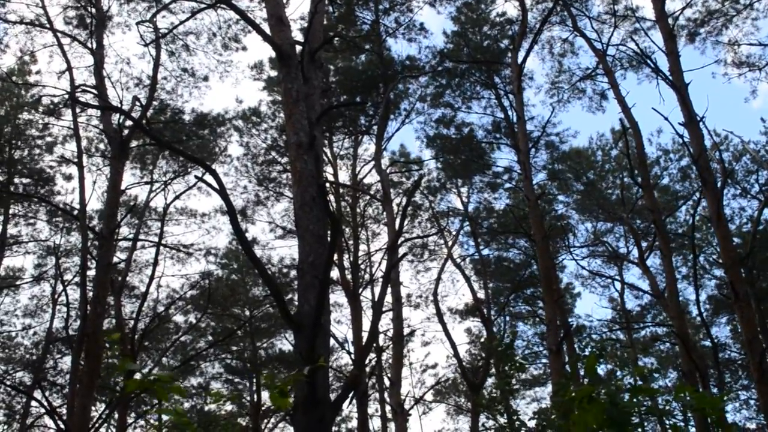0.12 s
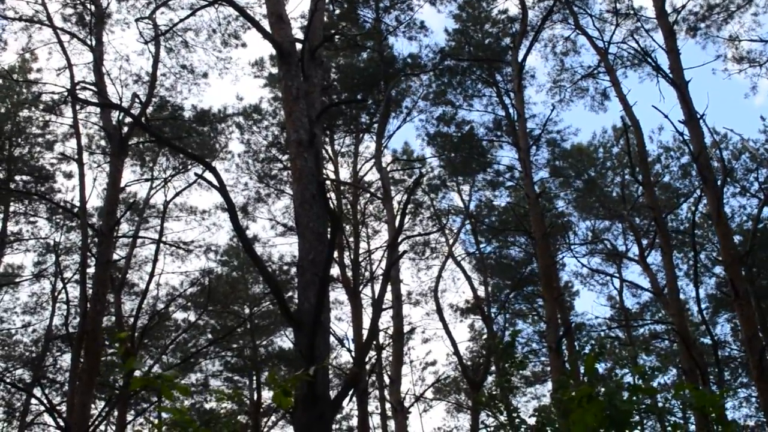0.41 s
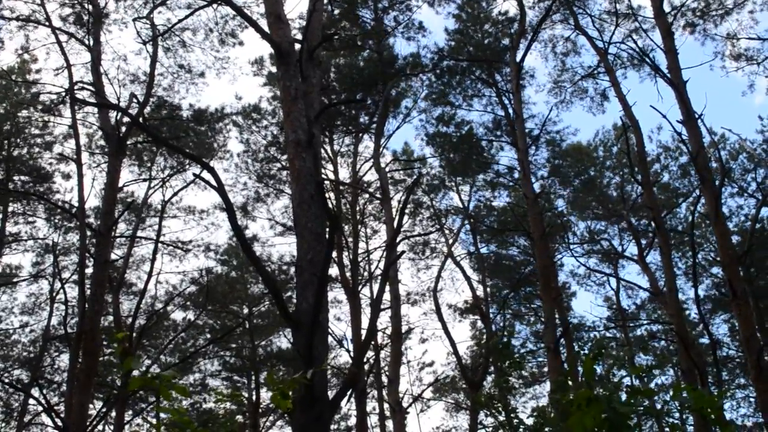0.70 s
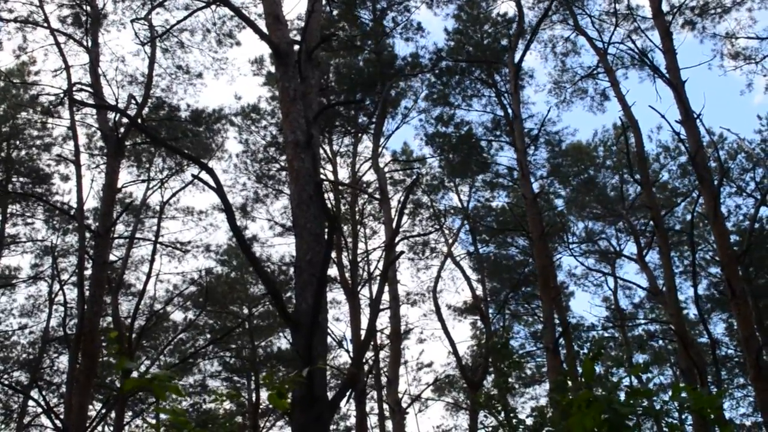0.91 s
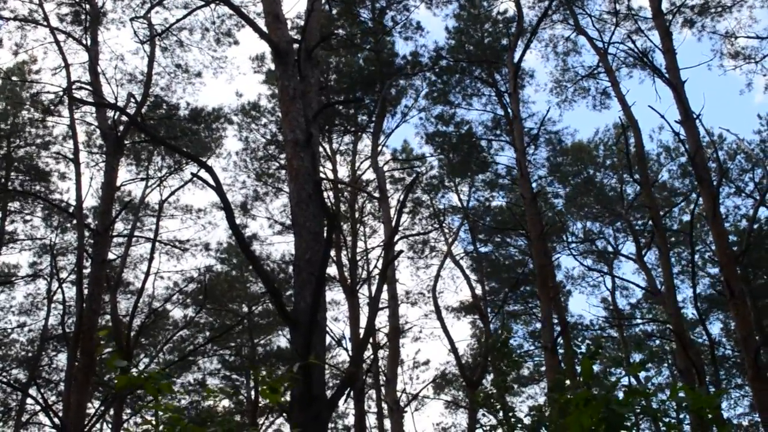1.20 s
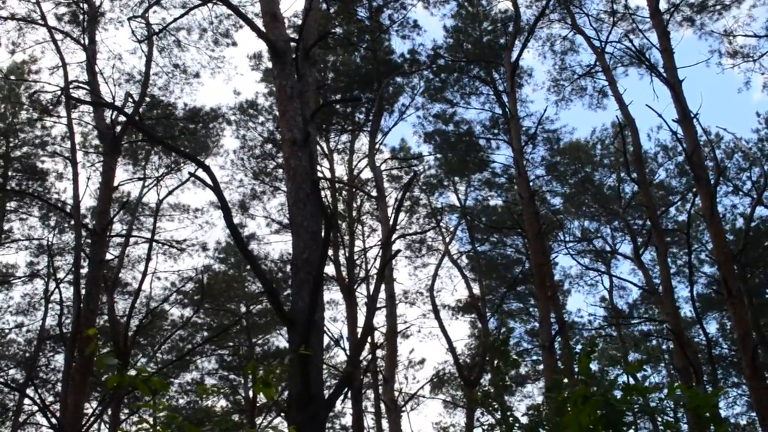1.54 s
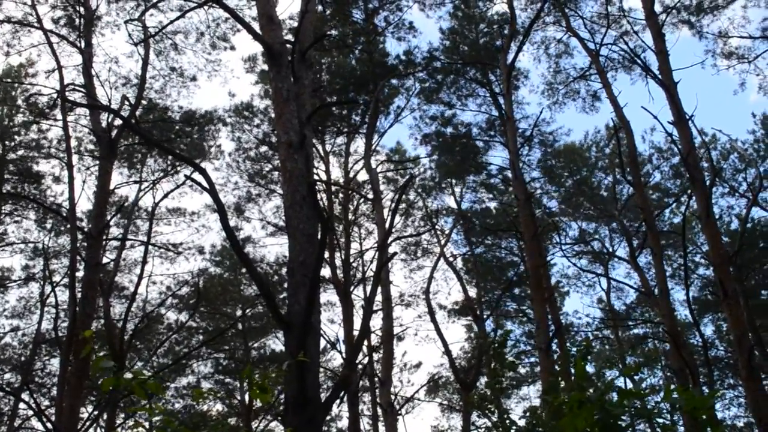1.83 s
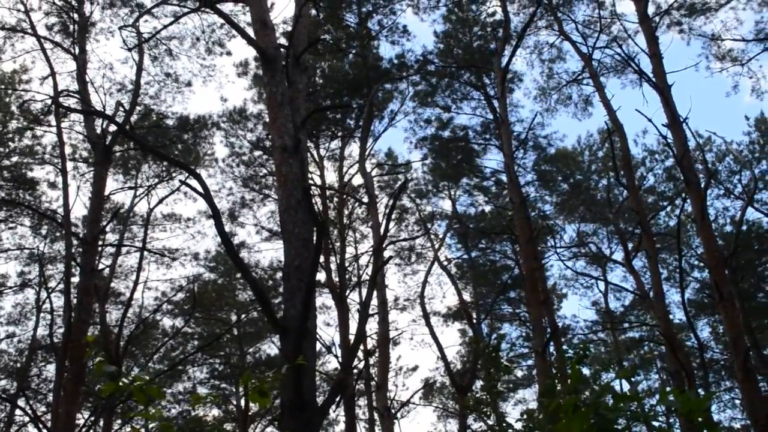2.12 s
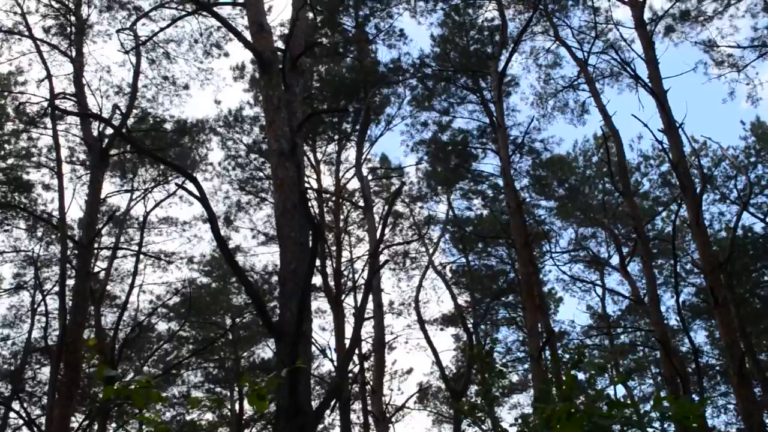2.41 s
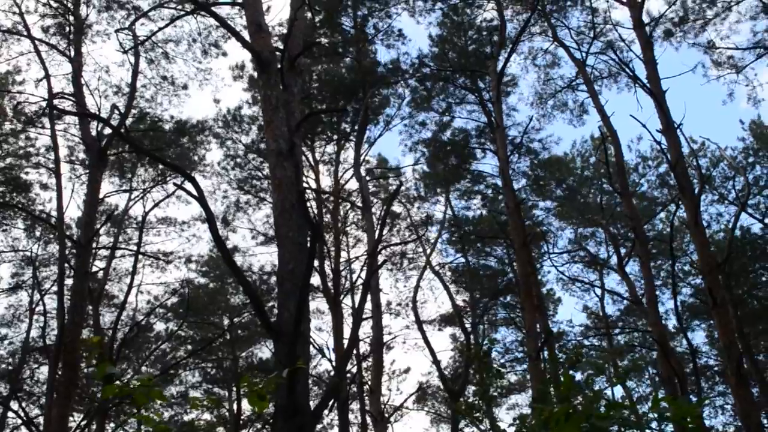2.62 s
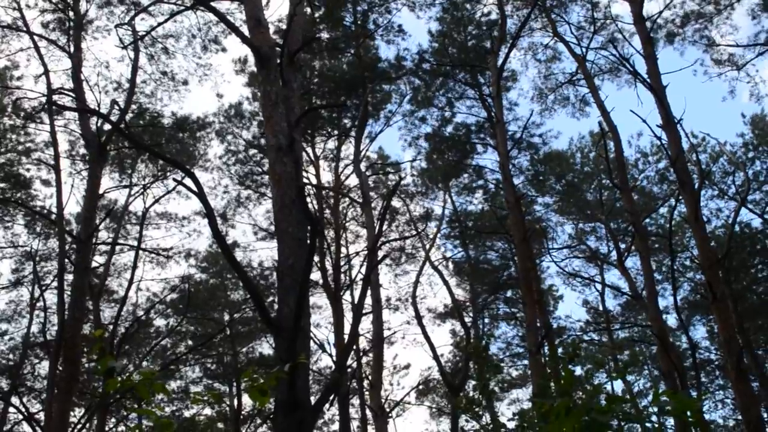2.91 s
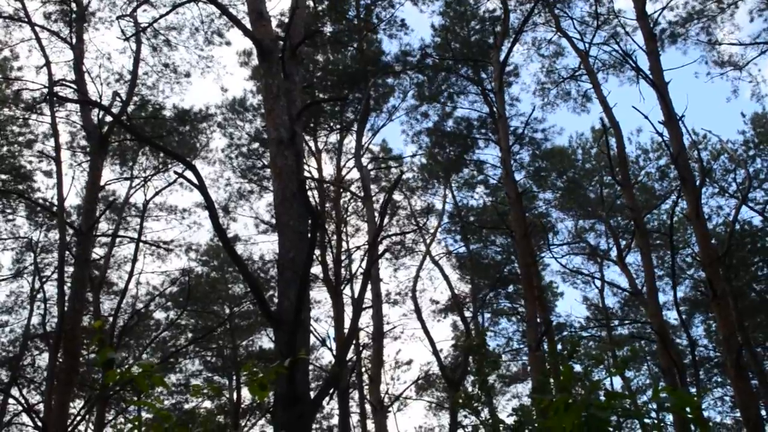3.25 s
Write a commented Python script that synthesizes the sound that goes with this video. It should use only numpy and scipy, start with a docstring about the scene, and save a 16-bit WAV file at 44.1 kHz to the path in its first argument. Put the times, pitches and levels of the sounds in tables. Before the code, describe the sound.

A songbird's high, sweeping chirps speed into a shivering trill, with faint birds farther off.

```python
"""A small songbird sings thin, upward-sweeping notes that speed up into a shivering trill.
Each note starts low and rich in overtones, then rises as an almost pure tone. The trunks of a quiet
pine forest scatter it into a short tail of echoes. Farther off, another bird whistles a low phrase
and faint calls waver. A twig ticks once, and air moves softly in the treetops."""
import sys
import numpy as np
from scipy import signal
from scipy.fft import rfft, irfft
from scipy.io import wavfile
from scipy.ndimage import uniform_filter1d

SR = 44100
rng = np.random.default_rng(int(sys.argv[2]) if len(sys.argv) > 2 else 0)


def file_out(sig):
    """Save sig as 16-bit WAV at sys.argv[1]."""
    # one column per channel
    cols = np.atleast_2d(sig).T
    # limit, then scale
    lim = np.clip(cols, -1, 1)
    pcm = np.round(lim * 32767).astype(np.int16)
    wavfile.write(sys.argv[1], SR, pcm)


N = 149940

# the colour of the moving air: (frequency [Hz], relative level [dB])
AIR_COLOUR = [(25, -18), (50, -17.5), (78, -10.5), (110, -13.5), (200, -9), (330, -2.5), (545, 1.5),
              (900, 0.5), (1300, -3), (1700, -7.5), (2450, -12), (3300, -13.5), (4500, -15.5), (6000, -25),
              (8000, -30.5), (10000, -27.5), (11000, -48.5)]
# the tones a twig rings with: (pitch [Hz], relative level [dB], time to fade by 60 dB [s])
TWIG_TONES = [(1404, 0, 0.027), (1950, -7, .025), (2530, -4.5, 0.014), (3190, 0.5, 0.013)]
# very distant calls: (start [s], length [s], first pitch [Hz], last pitch [Hz], level [dB])
DISTANT_CALLS = [(0, 0.132, 4580, 4340, -73), (0.41, 0.08, 2120, 2060, -65), (0.5, 0.28, 2310, 2260, -65),
                 (0.83, 0.055, 1806, 1815, -56.5), (0.88, 0.25, 2100, 2020, -65),
                 (1.275, 0.045, 2410, 2490, -60), (1.32, .11, 2510, 2490, -60),
                 (1.41, .11, 2420, 2130, -62)]
# the farther bird's whistles, one curve each: (time [s], pitch [Hz], level [dB])
WHISTLE_CURVES = [
    [(2.44, 1614, -75), (2.465, 1867, -55), (2.485, 1982, -48.5), (2.51, 1986, -65)],
    [(2.518, 2460, -60), (2.535, 2650, -54), (2.562, 2490, -54), (2.575, 2450, -68)],
    [(2.785, 2430, -58), (2.797, 2275, -49.5), (2.815, 2040, -61)],
    [(2.825, 1574, -53.5), (2.85, 1830, -53.5), (2.89, 1885, -47.5), (2.92, 1940, -45), (2.962, 1945, -45),
     (2.98, 2067, -54)],
    [(3.158, 2660, -58), (3.19, 2485, -47.5), (3.24, 2443, -51.5), (3.28, 2325, -43), (3.32, 2284, -52.5),
     (3.355, 2332, -51)],
    [(3.365, 2760, -61), (3.385, 2190, -49), (3.4, 1885, -44.5)],
]
# its one buzzy note: (time [s], pitch [Hz], level [dB])
BUZZ_CURVE = [(2.558, 2090, -48), (2.575, 2060, -51.5), (2.65, 2090, -45.5), (2.685, 2050, -51.5)]

# the songbird's notes; the "knee" is the moment when a note's low lead-in turns into its rise:
# (knee [s], lead-in [s], rise [s], top pitch [Hz], level [dB], shape [0 opening note to 1 trill note])
SONG_NOTES = [(0.1842, 0.015, 0.029, 9120, -34.5, 0.16), (0.3744, 0.016, 0.028, 8560, -34.5, 0.16),
              (0.5366, 0.013, 0.029, 8400, -31.5, 0.063), (0.6898, 0.016, 0.025, 8000, -27, 0.053),
              (0.8386, 0.016, 0.03, 7890, -26, 0.062), (.9825, 0.016, 0.032, 7920, -27.5, 0.012),
              (1.1236, 0.016, 0.029, 7820, -27, 0.081), (1.2552, 0.017, 0.029, 7800, -27, 0.066),
              (1.3875, 0.015, 0.029, 7750, -23, 0.039), (1.5205, 0.015, .029, 7650, -22, 0.25),
              (1.6352, 0.013, 0.023, 7580, -23, 0.29), (1.7132, 0.01, .018, 7480, -23.5, 0.6),
              (1.7715, 0.007, 0.022, 7520, -23, 0.9), (1.8329, 0.0076, 0.022, 7510, -23, 0.87),
              (1.893, 0.007, 0.022, 7440, -22.5, 0.9), (1.9543, 0.0074, 0.022, 7360, -23, 1),
              (2.0153, 0.0074, .0235, 7410, -23, 0.95), (2.0772, 0.0082, 0.021, 7480, -22.5, 1),
              (2.1379, 0.009, 0.021, 7530, -22.5, 0.94), (2.2, 0.011, 0.021, 7460, -23.5, 1),
              (2.2621, 0.012, 0.021, 7340, -23.5, 0.92), (2.3222, 0.011, 0.022, 7250, -24, 0.93),
              (2.3838, .010, 0.023, 7230, -25, 0.97), (2.4458, 0.011, 0.024, 7330, -23.5, 1),
              (2.509, .011, 0.022, 7260, -23.5, 1), (2.5697, .010, .0235, 7340, -23.5, 1),
              (2.6340, 0.012, 0.02, 7340, -22.5, 1), (2.698, 0.012, 0.021, 7380, -22.5, 0.96),
              (2.7603, .013, 0.021, 7360, -22, 0.95), (2.8242, .012, 0.02, 7390, -21, 0.98),
              (2.8875, .012, 0.021, 7300, -23.5, 1), (2.9555, 0.014, .018, 7170, -23.5, 0.94),
              (3.0205, 0.014, 0.018, 7220, -24.5, 0.94), (3.0815, .012, 0.021, 7110, -24, 1)]
# the lead-ins of opening notes and of trill notes:
# (place [-1 start, 0 knee], pitch [Hz], level [dB], second harmonic [dB])
OPENING_LEAD_IN = [(-1.2, 1900, -74, -57), (-.9, 2150, -68, -53), (-.55, 2750, -51.5, -45),
                   (-0.26, 3600, -42.5, -47), (0, 4550, -40.5, -48.5)]
TRILL_LEAD_IN = [(-1, 3600, -59, -64), (-0.68, 3870, -47.5, -68), (-0.29, 4200, -39.5, -67),
                 (0, 4480, -34.5, -58)]
# their rises, and the short downward hook that ends every note:
# (place [0 knee, 1 top], pitch [share of top], relative level [dB], second harmonic [dB])
OPENING_RISE = [(0.1, .715, -7.5, -28.5), (0.29, .845, -4, -28.5), (0.56, .9, 0.7, -40),
                (.93, 0.97, -3.3, -38)]
TRILL_RISE = [(0.15, .69, -2, -37.5), (.45, 0.81, -0.7, -43.5), (0.76, .93, 0.7, -31),
              (0.92, 0.982, -2.3, -44)]
END_HOOK = [(1.08, .997, -3.5, -42), (1.25, .935, -9, -45), (1.55, .8, -22, -50)]
# the colour of the songbird's voice: (frequency [Hz], gain [dB])
VOICE_COLOUR = [(3000, -3.5), (4600, -0.5), (5350, 0), (5900, -2.3), (6900, -1.6), (9000, -1), (10500, -9),
                (12000, -32)]
# how much of the song goes into the forest's echo: (time [s], gain [dB])
ECHO_AMOUNT = [(0.2, -12.5), (1.2, -10), (1.9, -13), (2.6, -12), (3.1, -12)]
# the colour of that echo: (frequency [Hz], gain [dB])
ECHO_COLOUR = [(2000, -3), (3100, -2), (4200, 4), (6000, 1.2), (7500, 0), (9500, 3)]

TIME = np.arange(N) / SR
FAR_ECHO_FADE_S = 0.9


def from_db(db):
    """Turn decibels into a number to multiply by."""
    return 10 ** (np.asarray(db) / 20)


def db_at(colour, hz):
    """Read a colour table at any frequency, with octaves evenly spaced."""
    table_hz, db = np.transpose(colour)
    return np.interp(np.log(np.maximum(hz, 1)), np.log(table_hz), db)


def coloured(sound, colour):
    """Make each frequency louder or softer, following a colour table."""
    hz = np.fft.rfftfreq(len(sound), 1 / SR)
    return irfft(rfft(sound) * from_db(db_at(colour, hz)), len(sound))


def glide(curve, smoothing=45):
    """Turn (time [s], pitch [Hz], level [dB]) rows into a span of samples with smooth pitch, phase, gain."""
    times, hz, db = np.transpose(curve)
    times = np.maximum.accumulate(times)
    span = slice(max(int(times[0] * SR) - smoothing, 0), min(int(times[-1] * SR) + smoothing, N))
    t = TIME[span]
    pitch = uniform_filter1d(np.interp(t, times, hz), smoothing)
    sounding = (t > times[0]) * (t < times[-1])
    gain = uniform_filter1d(from_db(np.interp(t, times, db)) * sounding, smoothing)
    return span, pitch, 2 * np.pi * np.cumsum(pitch) / SR, gain


def whistle(curve, swing_hz=0, rate_hz=1, dip_db=0):
    """A pure tone along a curve; its pitch can swing, and its level can dip at the top of each swing."""
    out = np.zeros(N)
    span, _, phase, gain = glide(curve)
    turn = 2 * np.pi * rate_hz * TIME[span]
    dip = from_db(-dip_db * (1 + np.cos(turn)) / 2)
    out[span] = gain * dip * np.sin(phase + swing_hz / rate_hz * np.sin(turn))
    return out


def scatter(sound, fade_s):
    """Countless echoes from trunks and branches, dying away by 60 dB in fade_s."""
    t = TIME[:SR]
    echoes = rng.standard_normal(SR) * from_db(-60 * t / fade_s) * (t > 0.0015)
    echoes /= np.sqrt(np.sum(echoes ** 2) + 1e-12)
    return signal.fftconvolve(sound, echoes)[:N]


def air(level_db=-57):
    """Air in the treetops makes a soft, steady rush of noise."""
    noise = coloured(rng.standard_normal(N), AIR_COLOUR)
    return from_db(level_db) * noise / noise.std()


def twig(start_s=1.786, level_db=-43):
    """One small dry tick: the wood rings with a few tones that die at once."""
    t = np.maximum(TIME - start_s, 0)
    return sum((-1) ** k * from_db(level_db + db - 60 * t / fade_s) * np.sin(2 * np.pi * hz * t)
               for k, (hz, db, fade_s) in enumerate(TWIG_TONES))


def distant_birds(soft_ends_db=6.5):
    """Wavering calls from so far away that they arrive mostly as echoes."""
    calls = np.zeros(N)
    for start, length, first_hz, last_hz, db in DISTANT_CALLS:
        curve = [(start, first_hz, db - soft_ends_db),
                 (start + length / 2, (first_hz + last_hz) / 2, db),
                 (start + length, last_hz, db - soft_ends_db)]
        # longer calls waver more widely
        calls += whistle(curve, swing_hz=400 * length, rate_hz=17 * rng.uniform(.7, 1.3))
    return from_db(-4) * calls + from_db(1) * scatter(calls, FAR_ECHO_FADE_S)


def farther_bird():
    """Sliding whistles and one buzz from deeper in the wood, where quick echoes make them flutter."""
    song = sum(whistle(curve) for curve in WHISTLE_CURVES)
    song += whistle(BUZZ_CURVE, swing_hz=185, rate_hz=58, dip_db=7)
    early = from_db(-5.5) * scatter(song, fade_s=0.22)
    tail = from_db(-3.5) * scatter(song, FAR_ECHO_FADE_S)
    return song + early + tail


def squeak(start, hz, length_s=0.01, db=-51):
    """A tiny, faint squeak that falls faster and faster."""
    return whistle([(start, hz, db - 6), (start + length_s / 2, hz - 250, db),
                    (start + length_s, hz - 1300, db - 8)])


def rising_note(knee, lead_in, rise, top_hz, db, trill):
    """One note: a low lead-in rich in overtones, then an almost pure rise that hooks down at the top."""
    is_trill = trill > .5
    effort_db = db + 26  # notes above -26 dB get a louder, richer lead-in
    low = np.array(TRILL_LEAD_IN if is_trill else OPENING_LEAD_IN)
    low = low + [0, 0, .8 * effort_db, 1.35 * effort_db]
    shape = (1 - trill) * np.array(OPENING_RISE) + trill * np.array(TRILL_RISE)
    high = np.vstack([shape, END_HOOK]) * [1, top_hz, 1, 1] + [0, 0, db, db]
    place, hz, first_db, second_db = np.vstack([low, high]).T
    if is_trill:  # as the trill goes on, the weight slides from the top of each note to its bottom
        tilt_db_per_octave = -8 * (knee - 2.2)
        first_db = first_db + tilt_db_per_octave * np.log2(hz / 5400)
    times = knee + place * np.where(place < 0, lead_in, rise)
    # no two notes are quite alike in pitch and level
    hz = hz * (1 + .003 * rng.standard_normal(len(times)))
    wobble_db = 0.4 * rng.standard_normal(len(times))
    out = np.zeros(N)
    for harmonic, level_db in enumerate((first_db, second_db, second_db - 16), 1):
        span, pitch, phase, gain = glide(np.transpose([times, harmonic * hz, level_db + wobble_db]))
        out[span] += gain * from_db(db_at(VOICE_COLOUR, pitch)) * np.sin(phase) * (pitch < SR / 2)
    return out


def songbird(trunk_delay_s=0.017):
    """The near bird sings among the trunks, and one close trunk sends back a distinct echo."""
    song = np.zeros(N)
    for knee, lead_in, rise, top_hz, db, trill in SONG_NOTES:
        song += rising_note(knee, lead_in, rise, top_hz, db, trill)
        # opening notes end in a high squeak, which vanishes as they turn into the trill
        song += (1 - trill) ** 2 * squeak(knee + 1.08 * rise, top_hz + 1500)
    trunk = from_db(-20.5) * np.interp(TIME - trunk_delay_s, TIME, song, left=0)
    early = from_db(-11.5) * scatter(song, fade_s=0.19)
    into_forest = song * from_db(np.interp(TIME, *np.transpose(ECHO_AMOUNT)))
    tail = scatter(coloured(into_forest, ECHO_COLOUR), fade_s=0.42)
    return song + trunk + early + tail


def scene():
    """All the birds and the twig over the forest's hush, in one channel."""
    return (songbird() + farther_bird() + distant_birds() + twig() + air())[None]


def record(dry):
    """A steep filter cuts away the treble above 11400 Hz."""
    return signal.sosfilt(signal.ellip(10, .1, 80, 11400, fs=SR, output="sos"), dry)


dry = scene()
out = record(dry)
file_out(out)
```